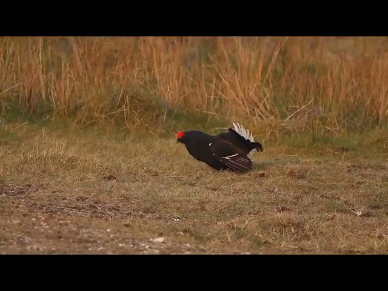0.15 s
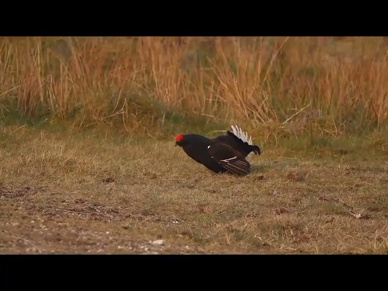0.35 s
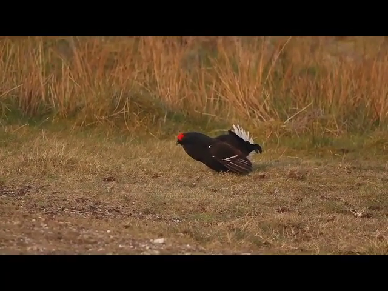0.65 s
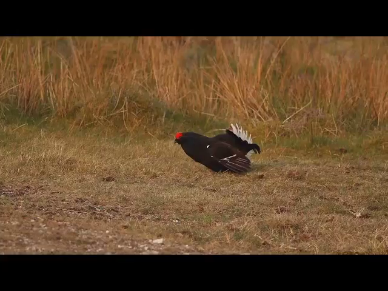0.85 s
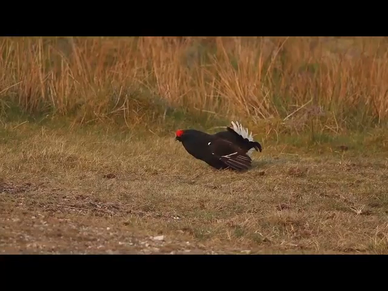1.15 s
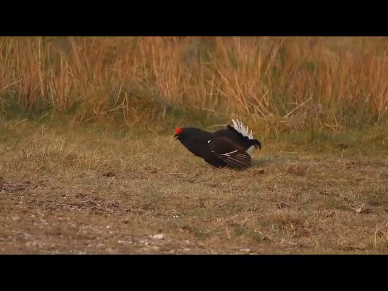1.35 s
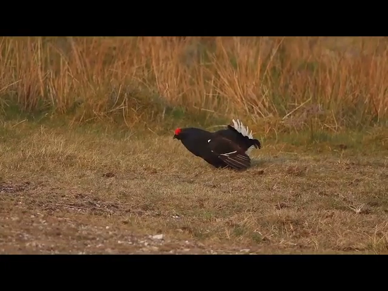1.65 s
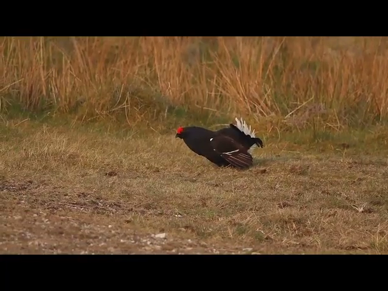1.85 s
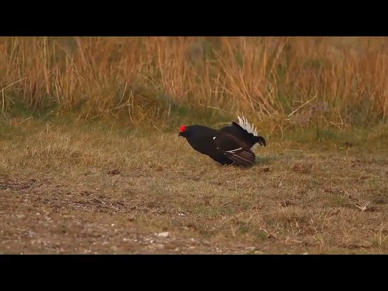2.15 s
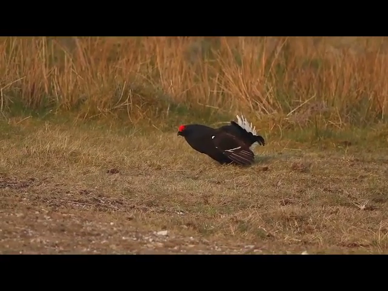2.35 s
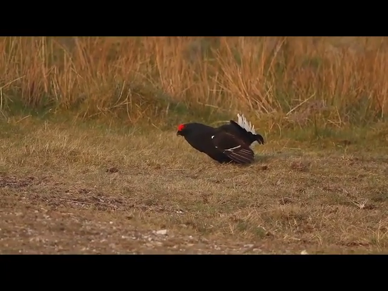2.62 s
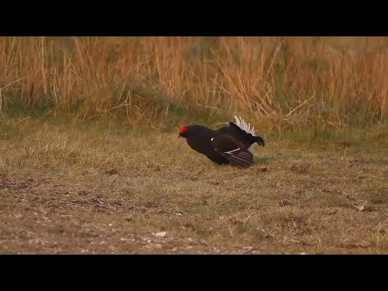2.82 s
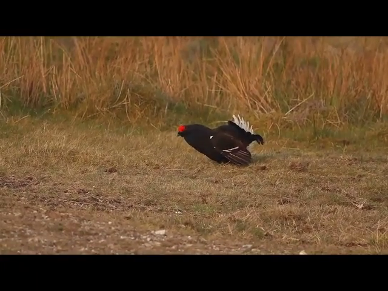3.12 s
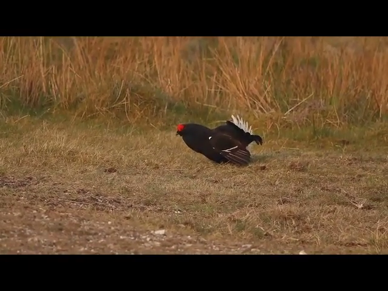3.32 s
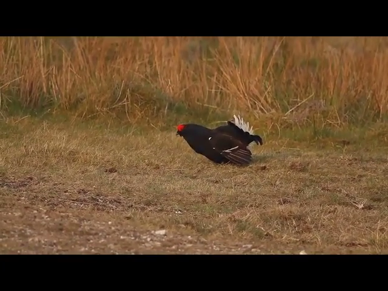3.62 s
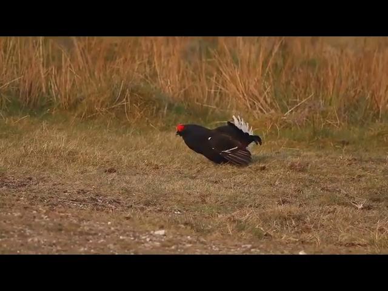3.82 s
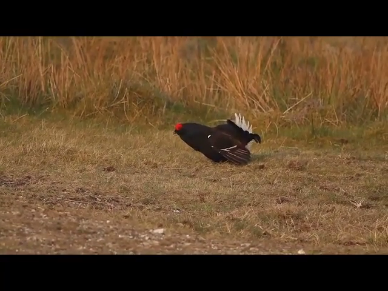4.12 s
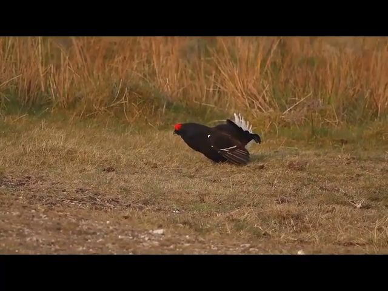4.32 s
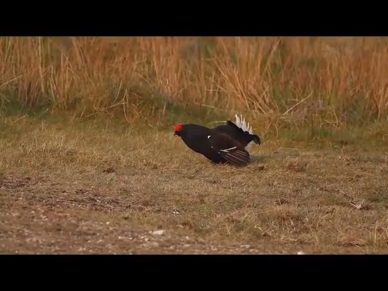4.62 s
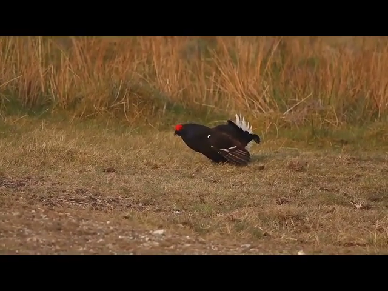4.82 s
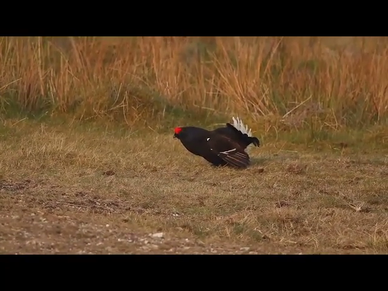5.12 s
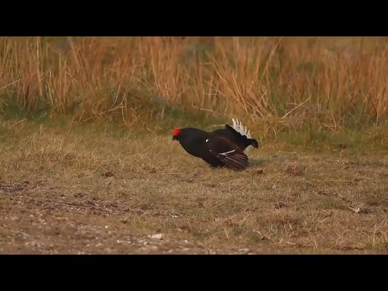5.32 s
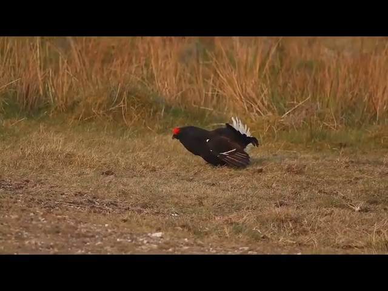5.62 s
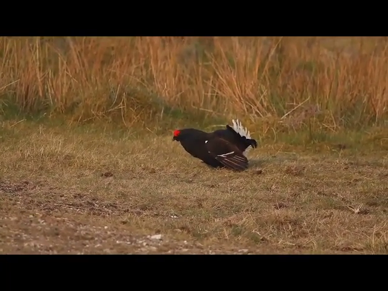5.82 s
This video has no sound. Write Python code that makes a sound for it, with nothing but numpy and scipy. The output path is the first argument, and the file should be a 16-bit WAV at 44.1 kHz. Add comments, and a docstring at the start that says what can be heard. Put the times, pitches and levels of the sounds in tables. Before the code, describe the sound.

Close mono outdoor capture of two male grouse cooing almost together, hollow and flute-like, like bubbling water. Each phrase ends in strong dipping notes, then a fast roll builds into the next. Thin, distant songbird twitters and sweeps sit above early on. One snap opens the scene, faint rustles follow, and low handling knocks and duller clicks arrive near the end, over quiet steady hiss.

```python
"""Black grouse on the lek

A black grouse cock bubbles on an open lek and a rival's song overlaps his: near-sine coos sliding in pitch.
Farther off a songbird whistles and trills: gliding sines with faint echoes.
Close to the microphone something clicks, rustles and bumps: shaped noise bursts and short low swings.
One mono microphone, with steady hiss and a low rumble of air, both filtered noise."""
import sys
import numpy as np
from scipy import signal
from scipy.fft import rfft, irfft, next_fast_len
from scipy.io import wavfile
from scipy.ndimage import map_coordinates

SR = 44100
rng = np.random.default_rng(int(sys.argv[2]) if len(sys.argv) > 2 else 0)


def makeup_ratio(level_db):
    """Linear amplitude ratio for a level in decibels (20 dB per factor of ten)."""
    decades = np.asarray(level_db, float) / 20
    return 10 ** decades


def output_pcm(signal):
    """Save a mono or channel-first signal as 16-bit PCM at the path in sys.argv[1].

    Samples are clipped to [-1, 1] before scaling.
    """
    pcm = np.clip(np.atleast_2d(signal).T, -1, 1) * 32767
    wavfile.write(sys.argv[1], SR, np.round(pcm).astype(np.int16))


N = 262836

# grouse songs: cock (0 or 1), phrase_start_s, roll_steps, roll_s (before slowing), phrase_pace (time factor)
SONGS = [(1, -.09, 0, 0, .991), (0, -.059, 0, 0, .997), (1, 2.519, 13, .862, .979),
         (0, 2.616, 16, 1.054, 1), (1, 5.196, 15, 1.0, .94), (0, 5.443, 8, .535, 1.02)]
# offset of each song: level_db
SONG_DB = [-5, -0.15, -2.5, 0.13, -1.5, 0.5]
# cocks: pitch_factor, lead_s (last roll note ahead of the phrase)
COCKS = [(1, 0), (.93, .058)]


def unit(x):
    """Scales to rms 1."""
    return x / np.sqrt(np.mean(x ** 2))


def wobble(rate_hz):
    """Smooth random curve through rate_hz knots a second."""
    knots = rng.standard_normal(int(N * rate_hz / SR) + 4)
    return map_coordinates(knots, [np.arange(N) * rate_hz / SR])


def filtered(x, response):
    """Multiplies the spectrum of x by a complex response of frequency."""
    m = next_fast_len(len(x) + 8192)
    return irfft(rfft(x, m) * response(np.fft.rfftfreq(m, 1 / SR)), m)[:len(x)]


def resonance(hz, width_hz):
    """Response of a causal second-order band-pass, gain 1 at hz."""
    return lambda f: 1j * f * width_hz / (hz * hz - f * f + 1j * f * width_hz)


def add(track, start_s, sound):
    """Mixes a sound into the track, trimmed at both ends."""
    i = round(start_s * SR)
    sound = sound[max(-i, 0):]
    part = track[max(i, 0):][:len(sound)]
    part += sound[:len(part)]


def progress(length_s):
    """Ramp from 0 towards 1 across a note."""
    return np.linspace(0, 1, max(round(length_s * SR), 8), endpoint=False)


def between(ends, u):
    """Linear way from the first end to the last."""
    return ends[0] + (ends[1] - ends[0]) * u


def tone(hz, overtone_db=-120):
    """Sine that follows hz from a random phase, plus a second harmonic."""
    phase = 2 * np.pi * (np.cumsum(hz) / SR + rng.random())
    return np.sin(phase) + makeup_ratio(overtone_db) * np.sin(2 * phase)


def slides(rows, roundness, bend):
    """Sines that swell, glide and fade; with bend above 1 the pitch lingers at its high end."""
    out = np.zeros(N)
    for start_s, length_s, first_hz, last_hz, level_db in rows:
        u = progress(length_s)
        way = u ** bend if last_hz < first_hz else 1 - (1 - u) ** bend
        swell = np.sin(np.pi * u) ** roundness
        add(out, start_s, makeup_ratio(level_db) * swell * tone(between((first_hz, last_hz), way)))
    return out


def echoes(x, t60_s):
    """Scattered returns from grass and trees: a decaying noise tail of energy 1."""
    t = np.arange(SR // 2) / SR
    tail = rng.standard_normal(len(t)) * makeup_ratio(-60 * t / t60_s) * (t > .004)
    return signal.fftconvolve(x, tail / np.linalg.norm(tail))[:N]


def grouse():
    """Closed-beak coos, nearly sines: the inflated throat sac keeps only the fundamental."""
    near = rolls() + phrases()
    throat_flutter_db = 2.2 * wobble(90) + 1.5 * wobble(45)
    near = near * makeup_ratio(throat_flutter_db)
    return near + makeup_ratio(-13.5) * echoes(near, t60_s=0.25)


def rolls():
    """Falling coos that come ever slower, higher, longer and louder, with slight random pitch and level."""
    # (first note, last note) of a full roll; shorter rolls join the climb on the way
    centre_hz, base_db, note_s = (422, 528), (-54, -42), (.055, .062)
    glide_bend = (1.1, 2.03)  # late notes hold their pitch, then drop
    full_roll_steps, slowing, slide_hz = 16, .045, 150
    pitch_late, level_late = 3.2, 5  # exponents: larger = later climb
    out = np.zeros(N)
    for (cock, phrase_s, steps, roll_s, _), song_db in zip(SONGS, SONG_DB):
        pitch_factor, lead_s = COCKS[cock]
        for back in range(steps + 1):  # from the last note backwards
            u = 1 - back / full_roll_steps
            pitch_climb = u ** pitch_late
            hz = pitch_factor * between(centre_hz, pitch_climb) + rng.normal(0, 8.7)
            level_db = between(base_db, u ** level_late) + song_db + rng.normal(0, 1.63)
            before_last_s = roll_s * back / max(steps, 1) * (1 + slowing * u)
            start_s = phrase_s - lead_s - before_last_s
            note = (start_s, between(note_s, u), hz + slide_hz / 2, hz - slide_hz / 2, level_db)
            out += slides([note], roundness=0.7, bend=between(glide_bend, pitch_climb))
    return out


def phrases():
    """Coos that drop at the end, longer ones rising first; loudest where pitch crosses the sac resonance."""
    # notes at pace 1, before sac and song gains: after_s, length_s, top_hz, cock_0_level_db, cock_1_level_db
    phrase_notes = [(0.28, 0.024, 660, -60, -51.5), (0.333, 0.068, 607.2, -45, -45),
                    (0.458, .026, 643, -52.5, -44.5), (0.573, 0.064, 622, -42.5, -40.5),
                    (.664, 0.04, 584, -44, -38), (0.744, .05, 604, -43.5, -39),
                    (0.795, 0.12, 599, -48.5, -49), (.99, 0.0248, 617, -44, -45.5),
                    (1.019, .04, 564, -43.5, -40.5), (1.079, .052, 649, -42, -43.5),
                    (1.166, 0.026, 667, -42, -40.5), (1.235, 0.072, 642, -36, -39),
                    (1.328, 0.047, 585, -43, -42.5), (1.374, 0.084, 610, -41, -41)]
    # flick that shuts the roll, same columns, after_s from the last roll note
    closing_flick = (.066, .034, 625, -44, -44)
    sac_hz, sac_width_hz = 507.6, 119
    rise_from_hz, drop_to_hz = 400, 380
    rise_s, drop_s = 0.0115, 0.0219  # at pace 1
    flick_s = .035  # notes up to this length only drop
    out = np.zeros(N)
    for (cock, phrase_s, _, _, pace), song_db in zip(SONGS, SONG_DB):
        pitch_factor, lead_s = COCKS[cock]
        flick = (closing_flick[0] - lead_s, *closing_flick[1:])
        for after_s, length_s, top_hz, *cock_db in [flick] + phrase_notes:
            u = progress(length_s * pace)
            t = u * length_s
            rise = (top_hz - rise_from_hz) * np.exp(-t / rise_s) * (length_s > flick_s)
            drop = (top_hz - drop_to_hz) * np.clip(1 - (length_s - t) / drop_s, 0, 1) ** 1.41
            hz = pitch_factor * (top_hz - rise - drop)
            sac_gain = np.abs(resonance(sac_hz, sac_width_hz)(hz))
            level_db = cock_db[cock] + song_db + rng.normal(0, 0.77)
            swell = np.sin(np.pi * u) ** 0.26
            add(out, phrase_s + after_s * pace, makeup_ratio(level_db) * swell * sac_gain * tone(hz))
    return out


def songbird():
    """Gliding sines: shaped syllables with a weak octave, plain whistles and fast trills, plus echoes."""
    # syllable shapes: length_share, pitch_hz, relative_level_db
    sweep_shape = [(0, 3310, -3), (.22, 3050, 1.5), (.56, 4250, 1), (.73, 4610, 8.5), (.85, 5650, 6),
                   (1, 3280, 2)]
    pipe_shape = [(0, 5560, -12), (.2, 5850, -8), (.55, 5580, -9.5), (.78, 5800, -19), (.86, 5850, -13),
                  (1, 5050, 2)]
    # syllables: start_s, base_level_db
    sweep_rows = [(1.363, -58.5), (1.591, -53), (1.798, -55.5)]
    pipe_rows = [(1.508, -49.5), (1.718, -47)]
    # whistles: start_s, length_s, first_hz, last_hz, peak_db
    whistle_rows = [(2.132, 0.07, 3400, 3850, -57), (2.215, .135, 3950, 4320, -62),
                    (2.385, 0.039, 3840, 4600, -65), (5.715, 0.045, 3080, 3020, -66),
                    (1.965, .026, 5500, 3700, -63), (2.695, .03, 4700, 3900, -69),
                    (.315, .03, 4700, 4200, -71), (.05, .02, 4400, 4800, -70), (.11, .02, 4500, 4900, -70),
                    (.64, .035, 3950, 3500, -70)]
    # trills of falling flicks: start_s, length_s, flick_rate_hz, first_hz, last_hz, fall_hz, peak_db
    trill_rows = [(1.986, 0.11, 75, 3536, 3480, 1090, -49.5), (2.426, 0.093, 160, 4700, 3730, 380, -58),
                  (2.514, .108, 110, 3620, 3210, 520, -57.5), (2.73, 0.11, 78, 3710, 3650, 910, -62.5)]
    # twitters, about three flicks and a whistle: start_s, whistle_peak_db
    twitter_rows = [(.868, -70), (.922, -68), (0.977, -63), (1.032, -59.5), (1.086, -58), (1.141, -56),
                    (1.199, -62)]

    twitter_whistles = [(s + .03, .024, 3950, 4150, db) for s, db in twitter_rows]
    out = slides(whistle_rows + twitter_whistles, roundness=0.22, bend=2.4)

    for shape, length_s, rows in ((sweep_shape, .082, sweep_rows), (pipe_shape, .076, pipe_rows)):
        share, pitch_hz, shape_db = np.transpose(shape)
        for start_s, base_db in rows:
            u = progress(length_s)
            level = makeup_ratio(base_db + np.interp(u, share, shape_db)) * np.sin(np.pi * u) ** 0.25
            add(out, start_s, level * tone(np.interp(u, share, pitch_hz), overtone_db=-18.5))

    twitter_flicks = [(s, .033, 96, 3350, 3650, 1000, db + 1.0 + rng.normal()) for s, db in twitter_rows]
    for start_s, length_s, rate_hz, first_hz, last_hz, fall_hz, peak_db in trill_rows + twitter_flicks:
        u = progress(length_s)
        flick = u * length_s * rate_hz % 1
        hz = between((first_hz, last_hz), u) + fall_hz * (.5 - flick)
        swell = np.sin(np.pi * u) ** .25 * np.sin(np.pi * flick) ** 1.3
        add(out, start_s, makeup_ratio(peak_db) * swell * tone(hz))
    return out + makeup_ratio(-9) * echoes(out, t60_s=0.057)


def clicks():
    """A sharp crack: band-limited noise with a fast and a slower decay."""
    # start_s, peak_db, t60_s, treble_edge_hz
    click_rows = [(0.4229, -24.5, 0.061, 30400), (4.396, -40.5, 0.044, 3150), (4.873, -28.5, 0.02, 2900),
                  (5.231, -41.5, 0.03, 3460), (5.261, -43.5, 0.043, 1800), (5.7604, -36.5, 0.019, 3990)]
    out, t = np.zeros(N), np.arange(SR // 8) / SR
    for start_s, peak_db, t60_s, edge_hz in click_rows:
        decay = makeup_ratio(-60 * t / t60_s) + 1.05 * makeup_ratio(-60 * t / 0.012)
        onset = 1 - np.exp(-t / 0.00092)
        colour = lambda f: 1j * f / (1j * f + 110) / (1 + 1j * f / edge_hz) ** 3
        burst = filtered(rng.standard_normal(len(t)) * decay * onset, colour)
        add(out, start_s, makeup_ratio(peak_db) * burst / np.abs(burst).max())
    return out


def rustles():
    """Grainy noise through one broad resonance and a weak wide one an octave above."""
    # middle_s, length_s, rms_db, resonance_hz, width_hz
    rustle_rows = [(0.379, 0.068, -43, 146, 232), (0.778, .17, -57.5, 2740, 1210),
                   (.79, .12, -68, 9000, 9000), (0.977, 0.1, -60.5, 2770, 1540),
                   (.985, .05, -66, 10000, 8000), (4.946, .14, -61.5, 2040, 2940),
                   (5.275, 0.1, -55, 388, 830), (5.59, 0.14, -52, 45, 80), (.51, .08, -56, 40, 60)]
    out = np.zeros(N)
    for middle_s, length_s, level_db, hz, width_hz in rustle_rows:
        u = progress(length_s)
        grains = rng.standard_normal(len(u)) * makeup_ratio(1.2 * wobble(266)[:len(u)])
        main, upper = resonance(hz, width_hz), resonance(2 * hz, 5 * width_hz)
        brushed = unit(filtered(grains, lambda f: main(f) ** 2 - makeup_ratio(-23) * upper(f)))
        swell = np.sin(np.pi * u) ** 0.75  # lowers the rms a little
        add(out, middle_s - length_s / 2, makeup_ratio(level_db) * swell * brushed)
    return out


def bumps():
    """Soft knocks on the microphone body: brief low pressure swings, then a rough noise shudder."""
    # middle_s, half_window_s, fundamental_level_db, pitch_hz
    bump_rows = [(4.633, 0.037, -31.5, 94.3), (4.736, 0.038, -33, 55.2), (4.837, 0.016, -30, 134),
                 (4.985, 0.0139, -33.5, 137), (5.005, 0.0098, -36.5, 114)]
    out = np.zeros(N)
    for middle_s, half_s, level_db, hz in bump_rows:
        u = progress(2 * half_s)
        push = np.exp(-((u - .5) / 0.12) ** 2)
        swing = tone(np.full_like(u, hz), overtone_db=-8.0)
        add(out, middle_s - half_s, makeup_ratio(level_db) * push * swing)
        u = progress(0.15)
        body = resonance(hz, 2 * hz)
        shudder = unit(filtered(rng.standard_normal(len(u)), lambda f: body(f) ** 2))
        add(out, middle_s, makeup_ratio(level_db - 18.5 - 20 * u) * np.sin(np.pi * u) ** .5 * shudder)
    return out


def air():
    """Filtered noise: smooth hiss over a rumble of wavering level."""
    # spectrum shape: frequency_hz, relative_level_db
    air_spectrum = [(15, -13), (60, -6), (146, 1), (228, -6.5), (620, -20), (3530, -24.5), (8180, -26.5),
                    (16000, -32.5)]
    hz, level_db = np.transpose(air_spectrum)
    colour = lambda f: makeup_ratio(np.interp(np.log(f + 1), np.log(hz + 1), level_db))
    low = lambda f: 1 / (1 + (f / 260) ** 4)
    hiss = unit(filtered(rng.standard_normal(N), lambda f: colour(f) * (1 - low(f))))
    rumble = filtered(rng.standard_normal(N), lambda f: colour(f) * low(f))
    rumble = unit(makeup_ratio(2.5 * wobble(12)) * rumble)
    return makeup_ratio(-62.5) * hiss + makeup_ratio(-61.5) * rumble


def scene():
    """Sums every source at one microphone, the same in both channels."""
    mono = grouse() + songbird() + clicks() + rustles() + bumps() + air()
    return np.array([mono, mono])


def low_pass(x):
    """Removes everything above the highest recorded frequency."""
    return signal.sosfilt(signal.butter(12, 16530, fs=SR, output="sos"), x)


def record(dry):
    """Cuts everything from 15850 Hz up and returns the finished sound."""
    band = np.array([filtered(channel, lambda f: f < 15850) for channel in dry])
    return low_pass(band)


dry = scene()
out = record(dry)
output_pcm(out)
```